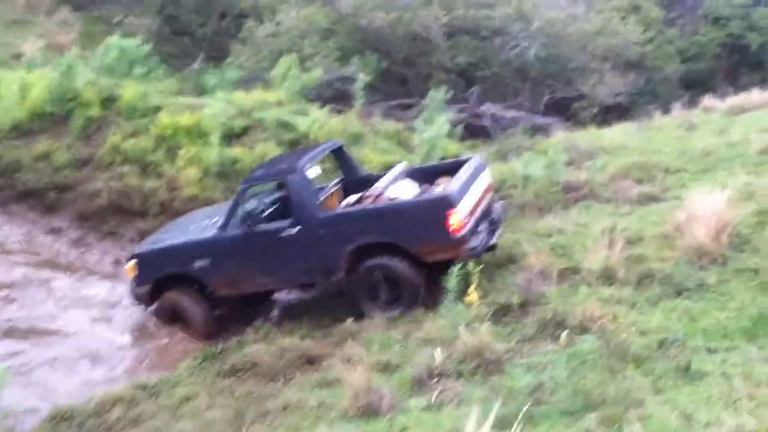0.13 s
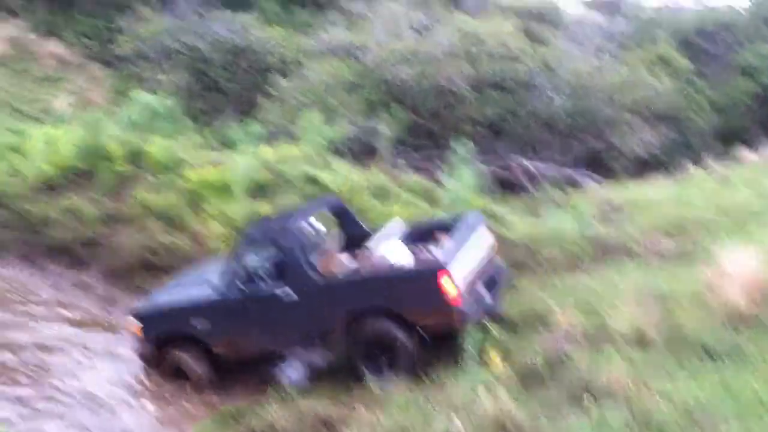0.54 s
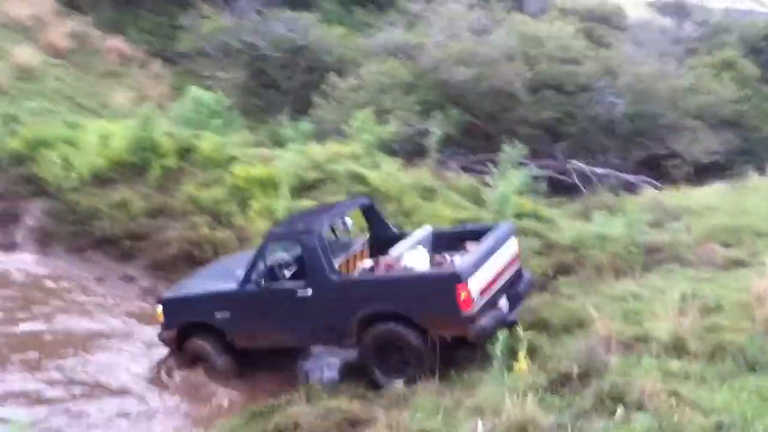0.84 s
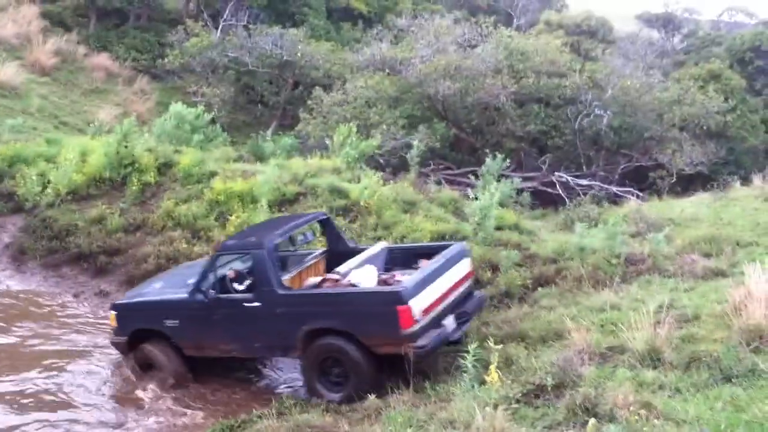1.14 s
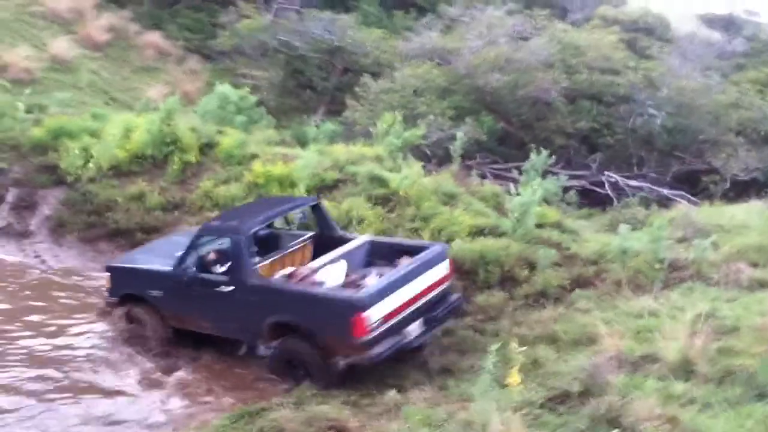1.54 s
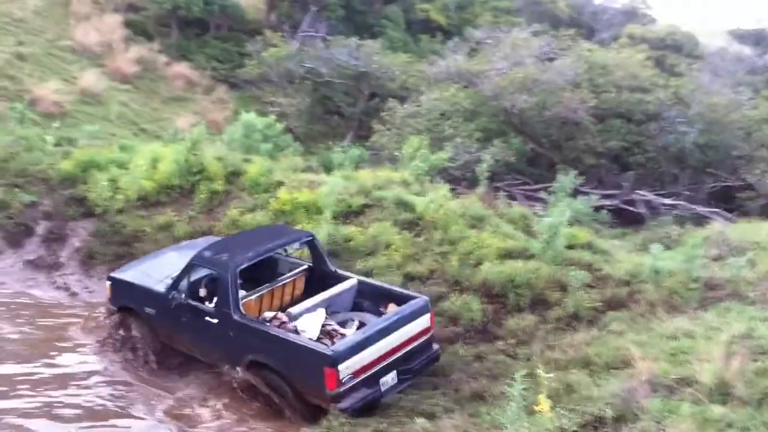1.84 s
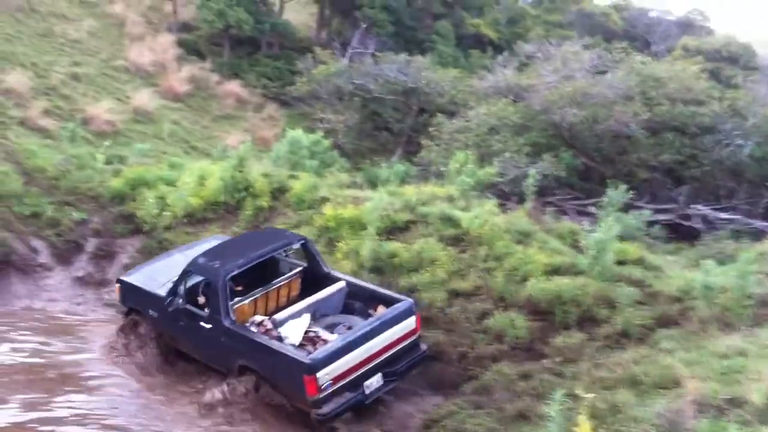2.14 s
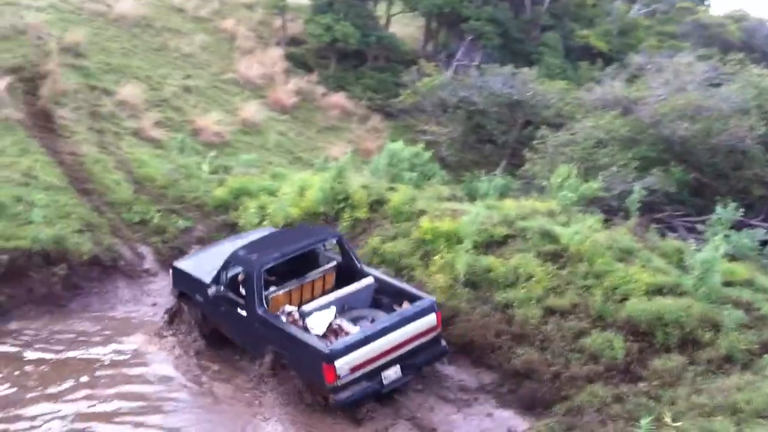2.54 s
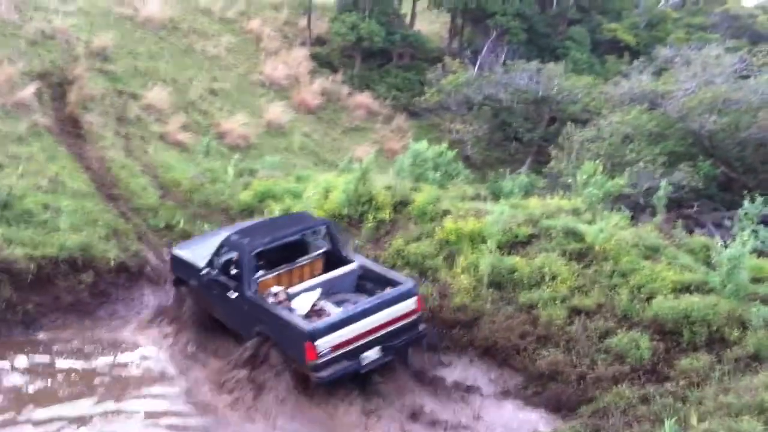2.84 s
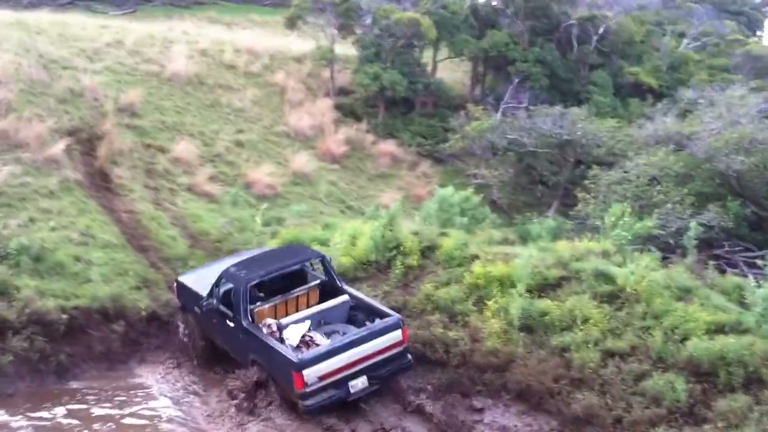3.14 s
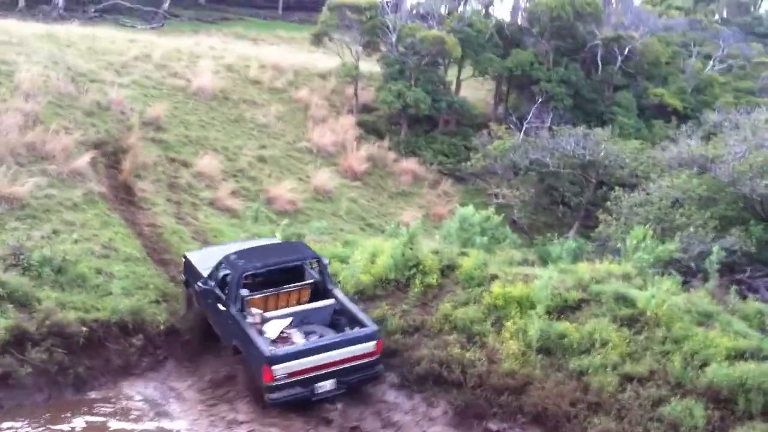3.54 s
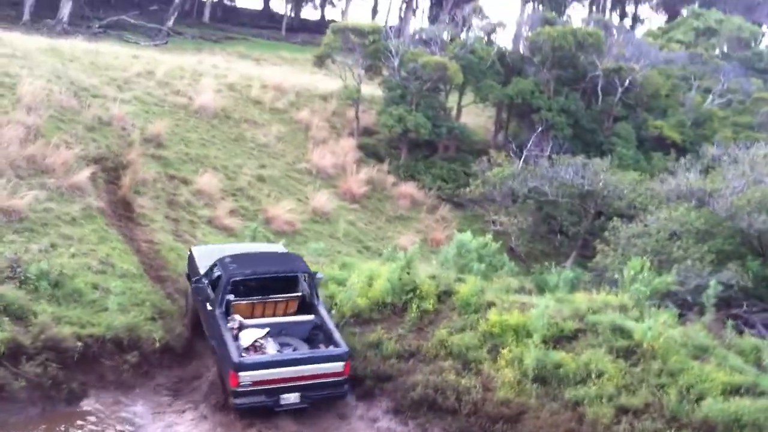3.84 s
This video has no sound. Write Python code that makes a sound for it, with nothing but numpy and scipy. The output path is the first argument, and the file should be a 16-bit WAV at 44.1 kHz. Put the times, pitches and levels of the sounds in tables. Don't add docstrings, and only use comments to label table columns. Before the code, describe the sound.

A pickup's eight-cylinder engine burbles unevenly at low idle, with a faint brake moan at the very start and a soft low body boom around 0.3 s. It sags until 0.8 s, then pulls up, water slapping and drumming in the wheel arches from 0.9 to 1.9 s. Revs climb to a roar by 2.5 s, ease slightly to 3.5, then surge again with churning spray to an abrupt end. Outdoors, muffled phone microphone.

```python
import sys
import numpy as np
from scipy import signal
from scipy.fft import rfft, irfft
from scipy.io import wavfile
from scipy.ndimage import uniform_filter1d

SR = 44100
rng = np.random.default_rng(int(sys.argv[2]) if len(sys.argv) > 2 else 0)


def inscribe(sig):
    pcm = np.round(np.clip(np.atleast_2d(sig).T, -1, 1) * 32767)
    wavfile.write(sys.argv[1], SR, pcm.astype(np.int16))


def amplitude_ratio(level_db):
    exponent = np.asarray(level_db, float) / 20
    return 10 ** exponent


N = 176400
T = np.arange(N) / SR

# frequency in Hz, density in dB per Hz.
AIR_COLOUR = [(25, -2.5), (60, -3), (300, 3.5), (1000, -4.5), (3000, -16.5), (7000, -27), (16000, -26.5)]
AIR_DB = -65

BRAKE_HZ, BRAKE_WIDTH_HZ, BRAKE_DB = 612, 10, -59
BRAKE_HOLD_S, BRAKE_FADE_DB_PER_S = .17, 55

# start in seconds, length in seconds, pitch in Hz, level in dB.
BODY_BOOM = (.23, .21, 151, -34.5)

# frequency in Hz, width in Hz, level in dB.
ARCH_MODES = [(1835, 260, -69), (1200, 320, -69.5), (680, 200, -62.5)]
ARCH_S, ARCH_LENGTH_S, ARCH_GRAIN_DB = .85, 1.1, 3.5

# time in seconds, level in dB.
CHURN = [(0.0, -84), (0.01, -72), (0.63, -75), (0.88, -70.5), (0.92, -66.5), (1.76, -62.5), (1.92, -59.5),
         (2.18, -60.5), (2.4, -64.5), (2.6, -64.5), (2.82, -67), (3.53, -64.5), (3.89, -56), (3.97, -56)]
# frequency in Hz, density in dB per Hz.
SPRAY_COLOUR = [(300, -18.5), (700, 8.5), (1200, 1), (2000, -3), (3000, -4.5), (4500, -4), (6000, -3),
                (9000, -6.5)]
SPRAY_DB, SPRAY_PATCH_DB, SPRAY_FLICKER_DB = 5.5, 1.8, 1.05
DROPS_DB, DROPS_PER_S, DROP_SPREAD_DB = -3, 3000, 2
# start in seconds, peak level in dB, pitch in Hz.
SPLASHES = [(0.7118, -60, 2568), (0.9063, -51, 4830), (0.9582, -51.5, 3480), (1.0106, -53, 2450),
            (1.0695, -55, 3260), (1.011, -56, 6400), (1.105, -53.5, 6700), (1.205, -60, 5200),
            (1.36, -57, 5900), (1.599, -54.5, 6200), (1.43, -54, 1800), (1.34, -52, 2200),
            (1.47, -48, 2000), (.965, -55.5, 1850), (1.2, -52.5, 1850), (1.095, -53.5, 1800),
            (1.235, -53, 2300), (1.1, -56, 1850), (1.49, -55, 1900), (0.97, -59, 5900), (0.86, -55, 3300),
            (1.4, -51, 6100), (.995, -51, 1000), (2.746, -50.5, 320), (2.938, -55, 650),
            (3.341, -51.5, 1100), (1.1532, -53, 2140), (1.46, -55, 5500), (1.3902, -52, 3450),
            (1.5207, -54, 5400), (1.8602, -57, 6200), (1.9874, -62, 3300), (2.354, -64.5, 2050),
            (3.6114, -58.5, 6115), (3.9484, -48, 6190)]
SPLASH_DB, SPLASH_T60_S, SPLASH_WIDTH_HZ = -9.5, .13, 900

# time in seconds, firing rate in Hz, exhaust level in dB, roar level in dB.
ENGINE = [(0, 68.6, -68, -63), (.78, 62.8, -71.5, -71), (.95, 76.55, -69, -62), (1.1, 89.1, -64.5, -58.5),
          (1.3, 95.8, -63, -61.5), (1.6, 101.7, -62.5, -55.5), (1.78, 107.4, -61.5, -56),
          (1.9, 126.2, -58, -50.5), (2.05, 149.3, -57, -49), (2.3, 155.4, -59, -54.5),
          (2.52, 168.6, -58.5, -55.5), (2.8, 163.5, -60, -56.5), (2.9, 162, -64.5, -53),
          (3.05, 160, -61.5, -52), (3.3, 151.2, -61.5, -56.5), (3.5, 148.3, -61.5, -50),
          (3.75, 163.6, -59, -51.5), (4, 176.6, -57, -45)]
CYLINDERS = 8
START_FIRINGS = 4.4

# frequency in Hz, density in dB per Hz.
ROAR_COLOUR = [(150, -25), (330, -4.5), (560, 4.5), (750, -1), (1000, -32), (1700, -37.5), (3000, -33),
               (7000, -40)]
ROAR_GATE, ROAR_PATCH_DB = .35, 1.3
SHADOW_HZ, SHADOW_WIDTH_HZ, SHADOW_SHARE = 453, 250, 0.5

STAGE_HZ = [66, 100, 150]
# idling, pulling and revving level in dB.
ORDER_DB = [(8, -10, -6), (8, -10, -9), (7, -3, 10), (5, -9, -3), (4, -6, -4), (11, 15, 16), (0, -8, -6),
            (-1, -12, 4), (5, 6, -4), (-2, -2, -3), (1, 2, -9), (2, -1, -3), (-7, 4, 3), (8, 7, -9),
            (-5, 0, -11), (-2, -8, -1), (3, 2, 8), (-5, -4, -2), (-8, 5, 2), (-9, 4, -1), (-8, 3, 1),
            (4, 8, 2), (-4, 7, 3), (-8, 6, 6), (-3, 4, 3), (-5, 0, 5), (-1, 0, 3), (-3, -4, 4), (-4, 0, 1),
            (3, -5, 1), (1, -1, 1), (1, -3, 0), (1, -1, 0), (1, -4, -1), (8, -3, -2), (5, -1, -2),
            (7, -6, -6), (6, 1, -6)]
FIRST_ORDER = 3
IDLE_SUB_DB = [-9, -2, 0]
BLUR_DB = [-22, -24, -19]
WANDER_DB, FIRING_WANDER_DB, WANDER_HZ = 1.8, .7, 3
LOPE_DEPTH = [.9, .55, 0]
LOPE_AT = [-.04, -.03, -.03]
LOPE_NARROW = [10, 1.8, 1.5]
SCATTER_GROWTH = [4, .8, 1.6]
LEAD_TURNS, SWEEP_TURNS, SCATTER_TURNS = 0.029, 0.01226, 0.21

# frequency in Hz, gain in dB.
PIPE_SIDE = [(40, -10), (80, 0), (125, 8), (160, 18), (200, 15), (310, -0.5), (390, -21.5), (800, -15)]
PIPE_TAIL = [(40, -10), (80, -0.5), (125, 7.5), (160, 19), (200, 12.5), (310, -3.5), (390, -7.5),
             (800, -15)]
# frequency in Hz, width in Hz, boost in dB.
PIPE_MODES = [(561.7, 50, 10), (353.8, 27, 10), (446, 21, 3)]
TURN_S, TURN_LENGTH_S = 1.89, 0.86
# start in seconds, length in seconds,
# multiple of the cycle, change in dB.
SWELLS = [(.45, 0.55, 24, 5.5), (1.95, 0.41, 10, 3.5), (2.0, .3, 12, 7), (3.75, 0.21, 25, 14.5),
          (2.1, 0.35, 24, 15), (2.9, 0.32, 19, 4.5), (1.26, 0.53, 15, 2.5), (1.9, 0.28, 13, 4),
          (.55, .3, 23, 7), (0.904, 0.44, 16, 8.5), (1.5, .3, 14, -7), (1.36, 0.6, 16, -2.5),
          (1.54, 0.51, 13, 8), (1.95, 0.41, 11, 6), (1.6, 1.2, 19, -13.5), (2.05, 0.24, 9, -3.5),
          (2.2, 0.35, 15, 2), (2.444, 0.34, 21, 13.5), (2.45, 0.32, 23, 10.5), (3.9, 2.2, 7, -4),
          (3.2, 0.9, 6, -11), (4.5, 0.52, 29, 10), (3.0, .25, 28, 10), (2.9, 0.53, 27, -4.5),
          (2.5, .6, 28, -11), (3.4, .5, 25, -10.5), (3.7, 0.24, 26, 9), (3.3, .5, 29, -9)]

# frequency in Hz, width in Hz, boost in dB.
CASE = [(1207, 475, 7), (1744, 230, 5), (3330, 620, 4), (6170, 490, 2.5), (1472, 190, -6), (2740, 620, -4),
        (967, 220, -4.5), (2400, 83, 4.5), (4580, 90, -1)]
# frequency in Hz, gain in dB.
MIC = [(6400, -1.5), (7000, -9), (7700, -16.5), (9000, -35.5), (11000, -45), (15800, -47)]
# frequency in Hz, density in dB per Hz.
HISS_COLOUR = [(300, -28), (6000, 2), (8000, 6), (10000, 0), (13000, -2.5), (15000, -3.5), (16000, -16)]
HISS_DB, LOW_CUT_HZ = -83, 39
CLOSE_S = .0006


def evened(x):
    return x / np.sqrt(np.mean(x ** 2) + 1e-20)


def read(points, hz):
    f, value = np.transpose(points)
    return np.interp(np.log(hz + 1), np.log(f + 1), value)


def course(table, column):
    rows = np.array(table, float)
    return np.interp(T, rows[:, 0], rows[:, column])


def bumps(table, hz):
    return sum(db / (1 + (2 * (hz - f) / w) ** 2) for f, w, db in table)


def hump(t, start_s, length_s):
    return np.sin(np.pi * np.clip((t - start_s) / length_s, 0, 1))


def drift(rate_hz, count):
    steps = N * 200 // SR + 2
    z = rfft(rng.standard_normal((count, steps)))
    z = z / (1 + (np.fft.rfftfreq(steps, 1 / 200) / rate_hz) ** 4)
    x = irfft(z, steps)
    return x / x.std(1)[:, None]


def resonate(x, hz, width_hz):
    turn = np.exp(2j * np.pi * hz * np.arange(len(x)) / SR)
    r = np.exp(-np.pi * width_hz / SR)
    return 2 * (turn * signal.lfilter([1 - r], [1, -r], x / turn)).real


def wash(colour, patch_db, flicker_db):
    frames, hz = N // 128 + 5, np.fft.rfftfreq(512, 1 / SR)
    a, b, patches = rng.standard_normal((frames, 257, 3)).T
    patches = uniform_filter1d(patches, size=6, axis=0)
    patches = evened(uniform_filter1d(patches, size=16, axis=1))
    flicker = evened(uniform_filter1d(rng.standard_normal(frames), size=6))
    level_db = read(colour, hz)[:, None] + patch_db * patches + flicker_db * flicker
    z = (a + 1j * b) * amplitude_ratio(level_db)
    return evened(signal.istft(z, nperseg=512, noverlap=384)[1][:N])


def air():
    return amplitude_ratio(AIR_DB) * wash(AIR_COLOUR, 1.3, 0.26)


def brake():
    rough = evened(resonate(rng.standard_normal(N), BRAKE_HZ, BRAKE_WIDTH_HZ))
    moan = np.sin(2 * np.pi * BRAKE_HZ * T) + 0.51 * rough
    return moan * amplitude_ratio(BRAKE_DB - BRAKE_FADE_DB_PER_S * np.maximum(T - BRAKE_HOLD_S, 0))


def boom():
    start_s, length_s, hz, db = BODY_BOOM
    return amplitude_ratio(db) * hump(T, start_s, length_s) ** 2 * np.sin(2 * np.pi * hz * T)


def arches():
    grain_db = ARCH_GRAIN_DB * evened(uniform_filter1d(rng.standard_normal(N), size=500))
    rush = amplitude_ratio(grain_db) * rng.standard_normal(N)
    rings = sum(amplitude_ratio(db) * evened(resonate(resonate(rush, hz, w), hz, w)) for hz, w, db in ARCH_MODES)
    return rings * np.sqrt(hump(T, ARCH_S, ARCH_LENGTH_S).clip(0))


def drops():
    lands = rng.random(N) < DROPS_PER_S / SR
    size = amplitude_ratio(DROP_SPREAD_DB * np.minimum(rng.exponential(1, N), 5)) * lands
    kind, out = rng.integers(0, 24, N), np.zeros(N)
    for k, hz in enumerate(np.geomspace(700, 6500, 24)):
        u = np.arange(round(7 * SR / hz)) * hz / SR
        ring = np.sin(2 * np.pi * u * (1 + 0.0083 * u)) * u * np.exp(-u / 0.8)
        out += signal.oaconvolve(size * (kind == k), ring)[:N]
    return evened(out)


def splashes():
    out, t = np.zeros(N), np.arange(SR // 8) / SR
    for start_s, db, hz in SPLASHES:
        noise = rng.standard_normal(len(t))
        slap = evened(resonate(resonate(noise, hz, SPLASH_WIDTH_HZ), hz, SPLASH_WIDTH_HZ))
        slap *= np.minimum(t / .002, 1) * amplitude_ratio(db + SPLASH_DB - 60 * t / SPLASH_T60_S)
        part = out[round(start_s * SR):][:len(t)]
        part += slap[:len(part)]
    return out


def water():
    spray = amplitude_ratio(SPRAY_DB) * wash(SPRAY_COLOUR, SPRAY_PATCH_DB, SPRAY_FLICKER_DB)
    return amplitude_ratio(course(CHURN, 1)) * (spray + amplitude_ratio(DROPS_DB) * drops()) + splashes()


def roar(turns):
    uneven = amplitude_ratio(2.5 * rng.standard_normal(CYLINDERS))[turns.astype(int) % CYLINDERS]
    gate = 1 - ROAR_GATE + ROAR_GATE * 3.2 * uneven * np.exp(-(turns % 1))
    gate = evened(uniform_filter1d(gate, size=40))
    return amplitude_ratio(course(ENGINE, 3)) * wash(ROAR_COLOUR, ROAR_PATCH_DB, .4) * gate


def ground_shadow(noise):
    side_on = np.clip((TURN_S + .3 - T) / .3, 0, 1)
    return noise - SHADOW_SHARE * side_on * resonate(noise, SHADOW_HZ, SHADOW_WIDTH_HZ)


def swell_db(order, t):
    return sum(db * hump(t, start_s, length_s) ** 2
               for start_s, length_s, m, db in SWELLS if round(m) == order)


def lope_of(firing_hz, turns):
    place = turns / CYLINDERS - np.interp(firing_hz, STAGE_HZ, LOPE_AT)
    sharpness = np.interp(firing_hz, STAGE_HZ, LOPE_NARROW)
    dip = np.exp(sharpness * (np.cos(2 * np.pi * place) - 1))
    return 1 - np.interp(firing_hz, STAGE_HZ, LOPE_DEPTH) * dip


def pipe_db(hz, tail):
    behind = read(PIPE_TAIL, hz) + bumps(PIPE_MODES, hz)
    return (1 - tail) * read(PIPE_SIDE, hz) + tail * behind


def exhaust(firing_hz, turns):
    count = len(ORDER_DB)
    wander, re, im = drift(WANDER_HZ, count), drift(10, count), drift(12, count)
    scatter, out = rng.standard_normal(count), np.zeros(N)
    at = np.arange(wander.shape[1]) / 200
    rate = np.interp(at, T, firing_hz)
    tail = np.clip((at - TURN_S) / TURN_LENGTH_S, 0, 1)
    lope = lope_of(firing_hz, turns)
    loose = np.interp(firing_hz, STAGE_HZ, SCATTER_GROWTH)
    for i, stage_db in enumerate(ORDER_DB):
        order = i + FIRST_ORDER
        k = order / CYLINDERS
        depth_db = FIRING_WANDER_DB if k == 1 else WANDER_DB
        level_db = np.interp(rate, STAGE_HZ, stage_db) + depth_db * wander[i]
        level_db = level_db + pipe_db(k * rate, tail) + swell_db(order, at)
        if k < 1 and i != 2:
            level_db = level_db + np.interp(rate, STAGE_HZ, IDLE_SUB_DB)
        blur = amplitude_ratio(np.interp(rate, STAGE_HZ, BLUR_DB) - 10 * (k == 1)) * (re[i] + 1j * im[i])
        size = amplitude_ratio(level_db) * (1 + blur)
        phase = k * turns + LEAD_TURNS * i + SWEEP_TURNS * (i - 12) ** 2
        if k != 1:
            phase = phase + SCATTER_TURNS * loose * scatter[i]
        tone = (np.interp(T, at, size) * np.exp(2j * np.pi * phase)).real
        if 1.3 < k < 3.4:
            tone = tone * lope
        elif k > 1.3:
            tone = tone * np.sqrt(lope)
        out += tone
    return np.sqrt(2) * out * amplitude_ratio(course(ENGINE, 2))


def scene():
    firing_hz = uniform_filter1d(course(ENGINE, 1), size=3000)
    turns = np.cumsum(firing_hz) / SR + START_FIRINGS
    noise = ground_shadow(roar(turns) + water() + arches())
    return (air() + brake() + boom() + noise + exhaust(firing_hz, turns))[None]


def roll_off(x):
    return signal.sosfilt(signal.butter(12, 15750, fs=SR, output="sos"), x)


def record(dry):
    hz = np.fft.rfftfreq(2 * N, 1 / SR)
    low_cut = 1 / np.sqrt(1 + (LOW_CUT_HZ / (hz + 1)) ** 4)
    response = amplitude_ratio(read(MIC, hz) + bumps(CASE, hz)) * low_cut
    heard = irfft(rfft(dry, 2 * N) * response)[:, :N]
    heard = heard + amplitude_ratio(HISS_DB) * wash(HISS_COLOUR, 0.54, .2)
    closing = np.sin(np.pi / 2 * np.clip((T[-1] - T) / CLOSE_S, 0, 1)) ** 2
    return roll_off(heard * closing)


dry = scene()
out = record(dry)
inscribe(out)
```